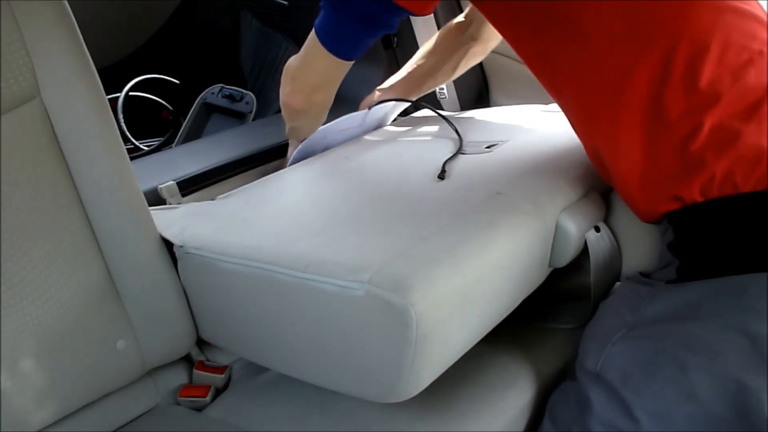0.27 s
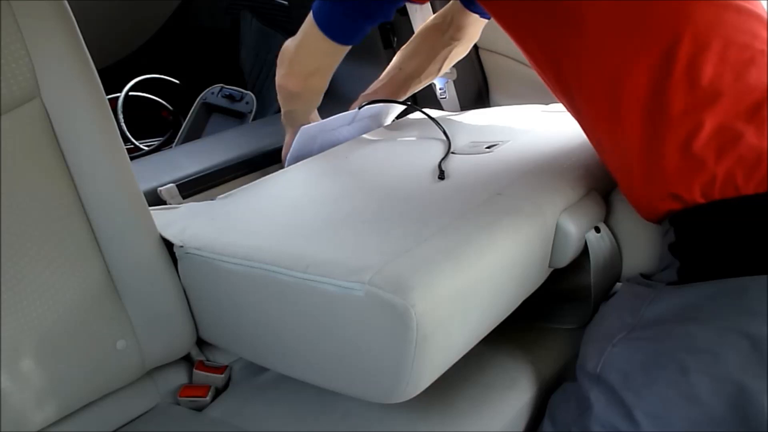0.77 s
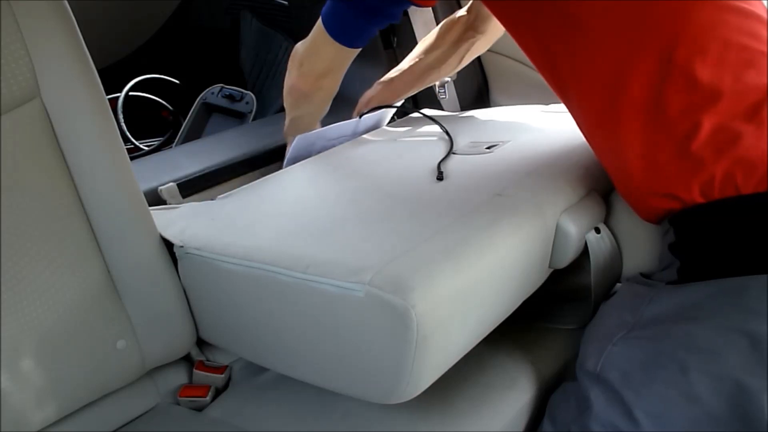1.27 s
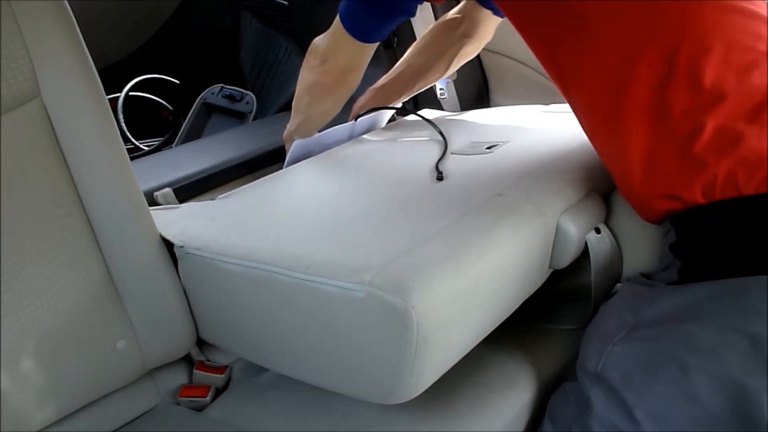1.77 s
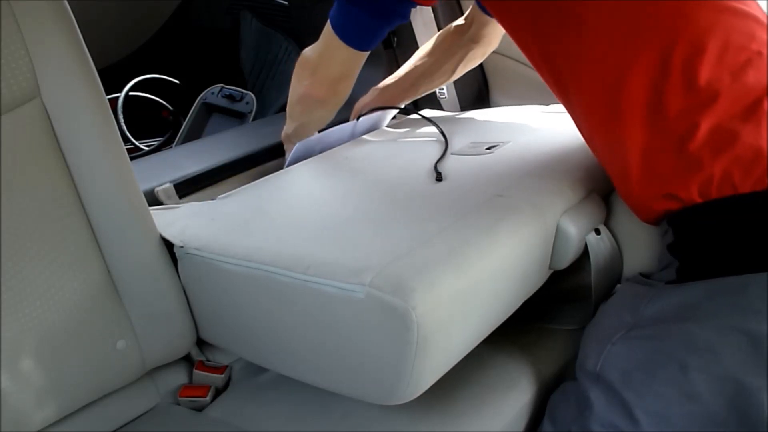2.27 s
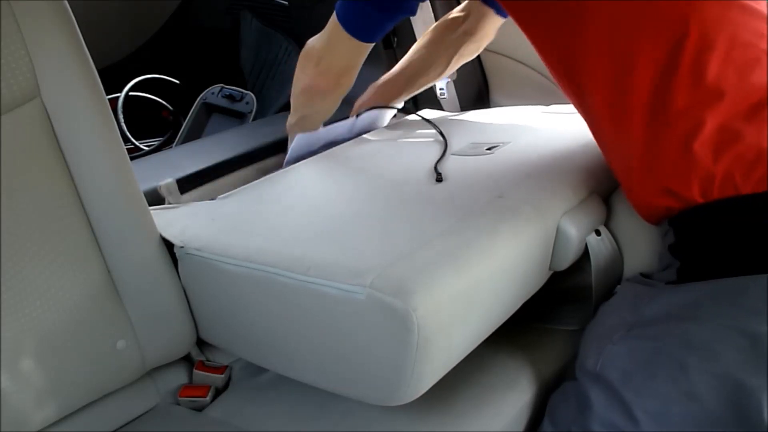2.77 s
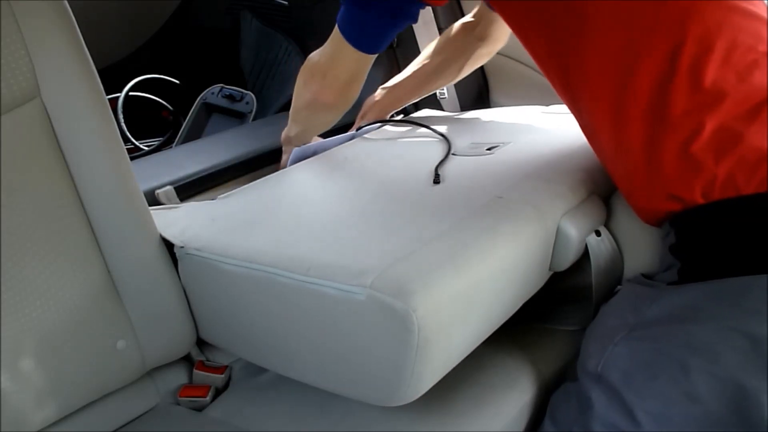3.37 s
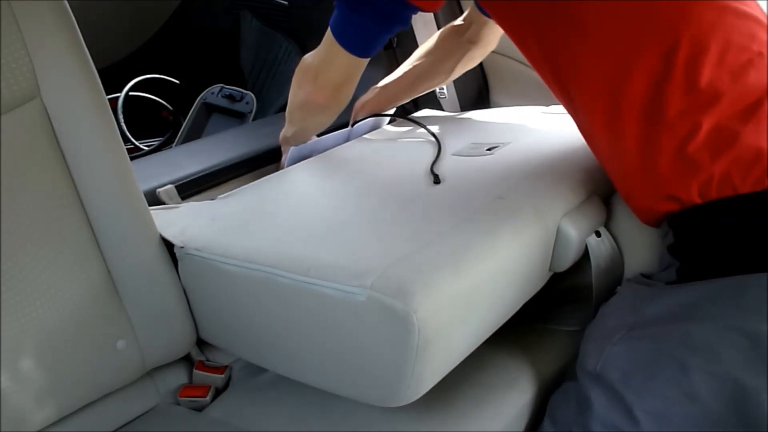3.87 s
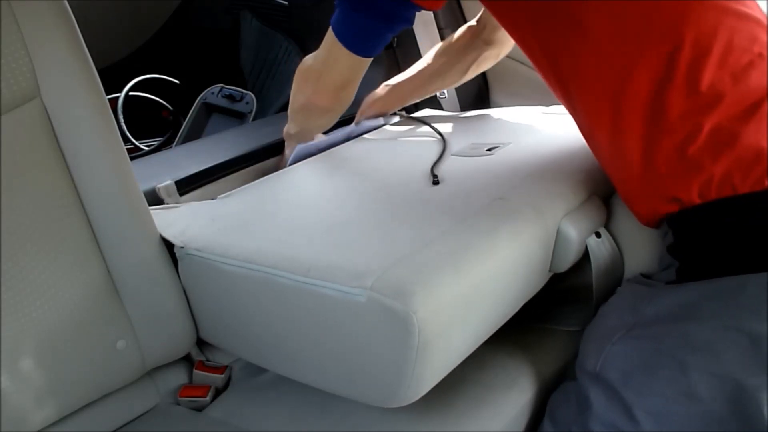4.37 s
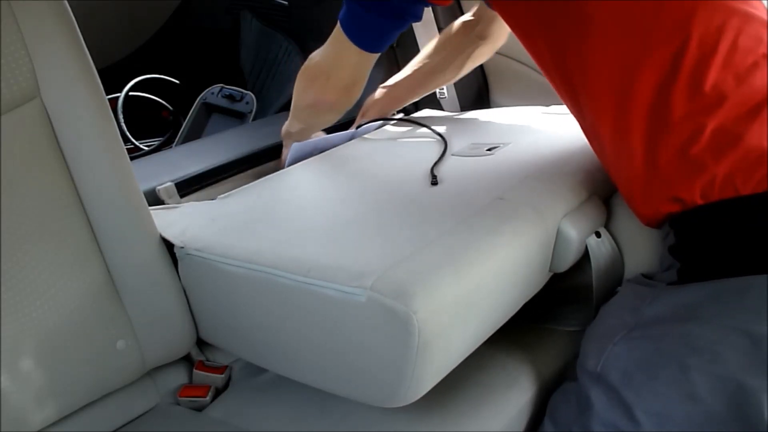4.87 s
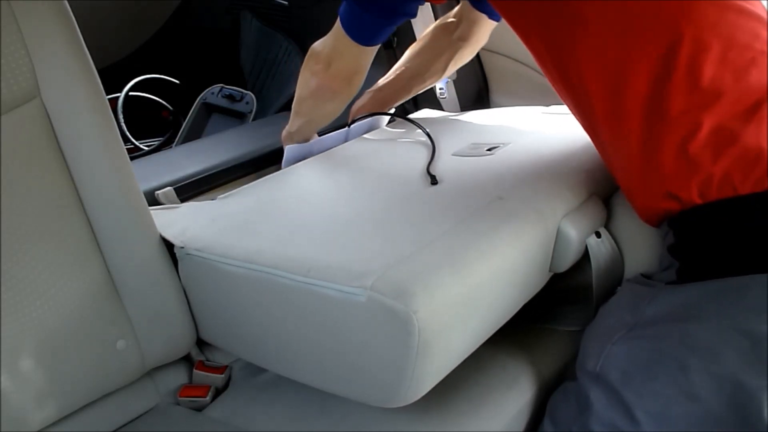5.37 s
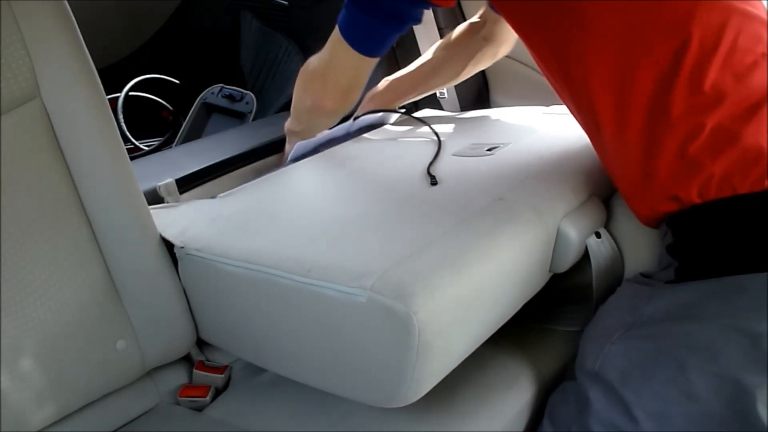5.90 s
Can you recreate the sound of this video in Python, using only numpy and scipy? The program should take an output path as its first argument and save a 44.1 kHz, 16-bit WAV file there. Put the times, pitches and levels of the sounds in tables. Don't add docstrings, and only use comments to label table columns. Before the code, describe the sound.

Fabric rubs quickly back and forth, several strokes a second, rustling over a soft cushion that rumbles beneath. A stiff edge occasionally rasps along a seam. Hands or a plug bump the seat frame with short, dull, woody rings and small crackles, strongest a little after one second, past four seconds and at the end. Close, dry small cabin with faint background rumble and microphone hiss.

```python
import sys
import numpy as np
from scipy import signal
from scipy.fft import rfft, irfft, next_fast_len
from scipy.io import wavfile

SR = 44100
rng = np.random.default_rng(int(sys.argv[2]) if len(sys.argv) > 2 else 0)


def dump_mix(stems):
    frames = np.atleast_2d(stems).T
    limited = np.clip(frames, -1, 1)
    pcm = np.round(limited * 32767).astype(np.int16)
    wavfile.write(sys.argv[1], SR, pcm)


def volts(x):
    e = np.asarray(x, float) / 20
    return 10 ** e


N = 270774

# start t/s, length/s, top hiss level/dB, share of
# the stroke spent speeding up, cover rustle level/dB above the hiss
STROKES = [(-0.061, 0.22, -48.5, 0.29, 1), (0.325, 0.2, -57.5, 0.47, -2.5), (0.821, 0.14, -53, 0.71, -3.5),
           (1.144, 0.14, -59.5, 0.44, 6.5), (1.396, 0.37, -54.5, 0.67, -0.3), (1.92, 0.23, -51.5, 0.6, 0.5),
           (2.275, 0.25, -53, 0.21, -0.7), (2.573, 0.12, -52, 0.61, -0.6), (2.919, 0.079, -55, 0.22, -3.5),
           (3.22, 0.12, -52.5, 0.43, -2.7), (3.492, 0.098, -51.7, 0.63, -1), (3.738, 0.115, -55, 0.9, -3),
           (3.983, 0.15, -58.5, 0.68, -3.5), (4.262, 0.36, -51.5, 0.28, -0.5), (4.801, 0.24, -54, 0.58, 1),
           (5.166, 0.15, -53, 0.43, 2.5), (5.503, 0.18, -58, 0.87, 4.5), (5.843, 0.2, -50.5, 0.33, -4.3),
           (6.064, 0.12, -53, 0.38, -2.5),
           (0.145, 0.17, -50, 0.48, 0.8), (0.46, 0.27, -58, 0.21, 1.5), (0.664, 0.19, -52.5, 0.36, -3),
         (0.951, 0.19, -52.5, 0.77, 1), (1.243, 0.23, -56.0, 0.49, 1.5), (1.771, 0.17, -52, 0.35, 0.5),
         (2.143, 0.13, -51, 0.5, -0.5), (2.464, 0.1, -52, 0.58, -6), (2.721, 0.22, -50, 0.48, 0.8),
         (3.015, 0.21, -50, 0.57, -2), (3.334, 0.15, -51.5, 0.45, -0.7), (3.606, 0.15, -51.5, 0.53, 0),
         (3.855, 0.135, -53.5, 0.78, 1.0), (4.136, 0.14, -57, 0.42, 0), (4.575, 0.28, -57.5, 0.25, 1.9),
         (5.064, 0.11, -53.5, 0.39, -0.5), (5.29, 0.14, -62, 0.32, 5), (5.442, 0.1, -61, 0.54, -2.5),
         (5.69, 0.11, -54.5, 0.65, 2.5), (5.989, 0.088, -52, 0.82, 2)]
# t/s, length/s, centre f/Hz, lift level/dB
SCRAPES = [(0.058, 0.085, 6350, 2.5), (0.762, .06, 3500, 2), (1.078, .05, 2480, 4.5),
           (1.33, .08, 2600, 6.5), (1.504, 0.077, 4300, 7), (2.345, 0.056, 4500, 4.5),
           (2.642, 0.065, 4350, 4.0), (2.849, 0.1, 5450, 4), (2.949, 0.077, 6270, 6.5),
           (3.05, 0.074, 5000, 2.5), (4.296, .05, 4500, 3.5), (4.64, .07, 4300, 4), (4.9, .14, 6000, 4)]
# f/Hz, level/dB
RUB_COLOUR = [(25, 12.5), (50, -1), (81, -4.5), (112, -7), (195, -3), (260, -9), (320, -5), (480, -12),
              (612, -11), (1290, -20), (2500, -23), (4300, -25), (5500, -26.5), (7200, -25.5), (9000, -38)]
LAYER_HZ = (150, 700, 2300, 5200)

# t/s, panel peak level/dB, thump level/dB above panel,
# shell level/dB above panel, share of the free ring length
KNOCKS = [(0.007, -32, -17, -25, 1.35), (0.026, -40, 16, -15, 0.6), (0.112, -30, -19, -12.5, 0.68),
          (0.434, -39, -7, -24, .9), (0.476, -33, -1, -17, 0.72), (0.58, -32.5, -3, -16, .75),
          (0.754, -30, -5, -14, 0.79), (0.779, -37, 3.5, -28, 0.71), (1.015, -32.5, -14, -26, 1.05),
          (1.086, -33, -8, -29, 1.3), (1.184, -26, -4.5, -14, .8), (1.213, -30, -16, -13.5, 0.94),
          (1.33, -25, -1, -8.5, 0.87), (2.34, -39, -20, -2, 0.84), (2.419, -33, -20, -17, 0.78),
          (2.881, -26, 4, -20, 0.86), (2.907, -42, 10.5, -24, 0.54), (3.396, -34, -15, -12, .9),
          (3.689, -36, -15, -13, 1.3), (3.963, -33.5, -23, -23, 0.92), (4.421, -20, -3.5, -2, 0.71),
          (4.442, -41.5, -4, 6.5, 1.2), (5.922, -37.5, -2, -16, 1.1), (6.035, -21.5, -3.5, -9, 1.12)]
# f/Hz, level/dB, 60 dB decay time/s
THUMP_MODES = [(96.5, -7, 0.28), (113.8, 2.5, 0.22), (132.4, 0, 0.17)]
PANEL_MODES = [(182.7, -1, 0.069), (201.8, 3, 0.11), (246, -4, 0.058), (323, -5, 0.13)]
SHELL_MODES = [(459, -11.5, 0.086), (581.5, 8, 0.037), (642, -3, 0.11), (792, -6, 0.047),
               (1020, -6.5, 0.029), (1260, -8, 0.016)]
# t/s, peak level/dB, centre f/Hz, 60 dB decay time/s,
# bright edge level/dB above the peak
CRACKS = [(0.1105, -34, 2870, 0.027, -3), (0.4757, -36, 1070, 0.04, -4), (0.7003, -44.5, 1980, 0.025, -11),
          (0.7515, -37, 2900, 0.06, -18), (1.067, -46, 2520, 0.031, -2), (1.1842, -38, 1600, 0.056, -18),
          (1.2132, -38.5, 3000, 0.018, -11.5), (1.2224, -42, 1100, 0.02, -8),
          (1.3305, -35, 1210, 0.079, 0.5), (2.3485, -43, 3900, 0.039, -11),
          (2.4194, -31.5, 1260, 0.018, -19), (2.6224, -38.5, 4670, 0.033, -9.5),
          (2.879, -31, 1110, 0.019, -14), (2.9503, -39.5, 2400, 0.02, -13), (3.9627, -34, 2300, 0.023, -14),
          (4.3935, -54, 1080, 0.025, -12), (4.4209, -27, 1310, 0.037, -4),
          (4.4424, -33.5, 1060, 0.025, -14.5), (6.0354, -32.5, 1540, 0.038, -9.5),
          (6.0975, -52.5, 1020, 0.045, 0)]

# f/Hz, level/dB
CABIN_COLOUR = [(25, -21), (60, -25), (220, 8), (620, -8), (1400, -18.5), (3000, -28), (5500, -27),
                (7200, -26.5), (9000, -27.5)]
# f/Hz, likeness from 0 to 1
LIKENESS = [(60, 0.95), (250, 1), (500, 0.9), (700, 0.49), (950, 0.37), (1450, 0.029), (2300, 0.17),
            (3200, 0.067), (4300, 0.25), (4750, 0.55), (5600, 0.18), (6400, 0.56), (7600, 0.95)]
# f/Hz, left minus right level/dB
LEAN = [(60, -1.5), (200, -1.0), (660, -1), (2180, 1.5), (7220, 1)]
# f/Hz, phase/rad
LEFT_LATE = [(100, 0.018), (600, 0.69), (1050, 0.41), (1500, .5), (2400, 0.87), (2900, 1.1), (4300, .55),
             (5000, .0)]

SPEED_POWER = 1.17
REST_HISS_DB, REST_RUSTLE_DB = -64, -57
SHEEN_FOLLOWS, RUMBLE_FOLLOWS = 1.11, 0.71
SHEEN_WANDER_DB, RUMBLE_WANDER_DB = 0.7, 1.5
PATCHY_DB = 1.7
SCRAPE_OCTAVES, CRACK_OCTAVES = 0.27, 1.4
BODY_LAG_MS = 4.52
SPOT_DB = 1.5
CABIN_DB, CABIN_T60_S, TRIM_CUT_HZ = -51, 0.17, 3500
LOW_CUT_HZ, TOP_HZ, FILTER_LAG_S = 85, 6360, 0.0015


def rubbing(slips_per_s, spread_db, catch_db, gain_db):
    hiss, sheen, rustle, rumble = strokes()
    layers = np.array([rumble, rustle, hiss, sheen])
    layers = layers - layers.mean(axis=1, keepdims=True)
    shape = (2, 2, N)
    sizes = volts(spread_db * np.minimum(rng.exponential(1, shape), 4))
    sizes = sizes * rng.choice([-1, 1], shape)
    slips = rms_one(sizes * (rng.random(shape) < slips_per_s / SR))
    catching = catch_db * drift(24.0)

    def level_db(hz):
        place = np.interp(np.log(hz), np.log(LAYER_HZ), np.arange(4))
        share = np.clip(1 - abs(place - np.arange(4)), 0, 1)
        motion = share @ layers + catching + scrape_db(hz)
        flicker = PATCHY_DB * np.clip(hz / 2000, 0.2, 1) * drift(8.0)
        return at_hz(RUB_COLOUR, hz) + motion + flicker

    return volts(gain_db) * stereo_bands(slips, level_db)


def strokes():
    start, length, hiss_db, rising, rustle_db = np.transpose(STROKES)[:, :, None]
    coarse = np.arange(0, N, 32)
    gone = np.clip((coarse / SR - start) / length, 0, 1)
    rising = np.clip(rising, 0.05, 0.95)
    ramp = np.minimum(gone / rising, (1 - gone) / (1 - rising))
    loudness = np.sin(np.pi / 2 * ramp) ** SPEED_POWER

    def total_db(top_db, rest_db):
        power = np.sum((loudness * volts(top_db)) ** 2, axis=0) + volts(rest_db) ** 2
        return np.interp(np.arange(N), coarse, 10 * np.log10(power))

    hiss = total_db(hiss_db, REST_HISS_DB)
    rustle = total_db(hiss_db + rustle_db, REST_RUSTLE_DB)
    sheen = SHEEN_FOLLOWS * hiss + SHEEN_WANDER_DB * drift(3.2)
    rumble = RUMBLE_FOLLOWS * rustle + RUMBLE_WANDER_DB * drift(1.3)
    return hiss, sheen, rustle, rumble


def scrape_db(hz):
    s, length, centre_hz, lift_db = np.transpose(SCRAPES)[:, :, None]
    t = np.arange(0, N, 64) / SR
    off_pitch = np.log2(hz / centre_hz) / SCRAPE_OCTAVES
    bell = np.exp(-(2 * (t - s) / length) ** 2 - off_pitch ** 2)
    return np.interp(np.arange(N) / SR, t, np.sum(lift_db * bell, axis=0))


def knocks():
    out = np.zeros(N + SR)
    t = np.arange(SR // 3) / SR
    chance = rng.standard_normal((len(KNOCKS), 40))
    for (s, panel_db, thump_db, shell_db, length), luck in zip(KNOCKS, chance):
        # modes, level in dB, share of the lag
        parts = [(THUMP_MODES, thump_db - 7.0, 1.0),
                 (PANEL_MODES, -4.0, 0.7),
                 (SHELL_MODES, shell_db - 2.0, 0.2)]
        for k, (modes, part_db, lag_share) in enumerate(parts):
            hz, level_db, t60 = np.transpose(modes)[:, :, None]
            spot = luck[12 * k:12 * k + 12].reshape(2, 6, 1)[:, :len(modes)]
            rise = 1 - np.exp(-t * hz * 4.15)
            fall_db = -60 * t / (t60 * max(length, 0.2))
            decay = volts(level_db + SPOT_DB * spot[0] + fall_db)
            tones = np.sin(2 * np.pi * hz * (1 + 0.0081 * spot[1]) * t)
            ring = np.sum(rise * decay * tones, axis=0)
            at = round((s + lag_share * BODY_LAG_MS / 1000) * SR)
            out[at:at + len(t)] += volts(panel_db + part_db) * ring
    return out[:N]


def cracks():
    out = np.zeros((2, N + SR))
    t = np.arange(SR // 10) / SR
    body_rise = 1 - np.exp(-t / 0.002)
    edge_rise = 1 - np.exp(-t / 0.00036)
    for s, peak_db, hz, t60, edge_db in CRACKS:
        mid, side = rng.standard_normal((2, len(t)))
        pair = np.array([mid + 0.68 * side, mid - 0.26 * side])
        fall_db = -60 * t / max(t60, 0.003)
        low, high = np.clip(hz * 2 ** (np.array([-0.5, 0.5]) * CRACK_OCTAVES), 300, 9000)
        body = band(pair * volts(fall_db) * body_rise, low, high)
        edge = band(pair * volts(5.5 * fall_db) * edge_rise, 2200, 5400)
        at = round(s * SR)
        out[:, at:at + len(t)] += volts(peak_db) * (body + volts(edge_db + 6.5) * edge)
    return out[:, :N]


def cabin_echo(x):
    size = next_fast_len(N + SR // 2)
    w = 2 * np.pi * np.arange(size // 2 + 1) / size
    dull = 1 / (1 + 1j * w * SR / (2 * np.pi * TRIM_CUT_HZ))
    out = np.zeros((2, len(w)), complex)
    for k, lag in enumerate(rng.uniform(0.0056, 0.0098, 12) * SR):
        loss = volts(-60 * lag / SR / CABIN_T60_S)
        loop = loss * dull * np.exp(-1j * w * lag)
        out[k % 2] += loop / (1 - loop) * (-1) ** (k // 2)
    return irfft(out * rfft(x, size), size)[:, :N]


def cabin_air():
    noise = rng.standard_normal((2, 2, N))
    air = stereo_bands(noise, lambda hz: at_hz(CABIN_COLOUR, hz))
    return volts(CABIN_DB) * rms_one(air)


def stereo_bands(source, level_db):
    out = 0
    edges = 25 * 2 ** (np.arange(27) / 3)
    for k, (low, high) in enumerate(zip(edges, edges[1:])):
        sos = signal.butter(2, [low, high], "band", fs=SR, output="sos")
        mid, side = signal.sosfilt(sos, source[k % 2])
        hz = np.sqrt(low * high)
        alike = np.clip(at_hz(LIKENESS, hz), 0, 1)
        left, right = np.sqrt(1 + alike) * mid + np.sqrt(1 - alike) * side * [[1], [-1]]
        late = round(at_hz(LEFT_LATE, hz) / (2 * np.pi * hz) * SR)
        lean = volts(at_hz(LEAN, hz) / 2)
        pair = np.array([np.roll(left, late) * lean, right / lean])
        out = out + volts(level_db(hz)) * pair
    return out


def drift(rate):
    r = np.exp(-80 * np.pi * rate / SR)
    noise = rng.standard_normal(N // 40 + 2002)
    slow = signal.lfilter([1], [1, -2 * r, r * r], noise)[2000:]
    return np.interp(np.arange(N) / 40, np.arange(len(slow)), rms_one(slow))


def band(x, low_hz, high_hz):
    y = signal.sosfilt(signal.butter(2, [low_hz, high_hz], "band", fs=SR, output="sos"), x)
    return y / abs(y).max()


def at_hz(points, hz):
    table_hz, value = np.array(points).T
    return np.interp(np.log(hz), np.log(table_hz), value)


def rms_one(x):
    return x / np.sqrt(np.mean(x ** 2) + 1e-20)


def scene():
    rub = rubbing(slips_per_s=7000.0, spread_db=2.5, catch_db=1.25, gain_db=-27.5)
    hits = knocks() * volts(np.array([[-0.4], [0.4]])) + cracks()
    treble = signal.butter(3, 900, "high", fs=SR, output="sos")
    bright = signal.sosfilt(treble, hits.mean(axis=0))
    return rub + hits + volts(-18.5) * cabin_echo(bright) + volts(-1.0) * cabin_air()


def band_limit(x):
    return signal.sosfilt(signal.butter(12, 7820, fs=SR, output="sos"), x)


def record(dry):
    bass_cut = signal.butter(3, LOW_CUT_HZ, "high", fs=SR, output="sos")
    top_cut = signal.butter(8, TOP_HZ, fs=SR, output="sos")
    wall = signal.ellip(8, 0.5, 50, 7760, fs=SR, output="sos")
    lag = round(FILTER_LAG_S * SR)
    padded = np.pad(dry, ((0, 0), (0, lag)), "reflect")
    mix = signal.sosfilt(np.vstack([bass_cut, top_cut, wall]), padded)[:, lag:]
    return band_limit(mix)


dry = scene()
out = record(dry)
dump_mix(out)
```